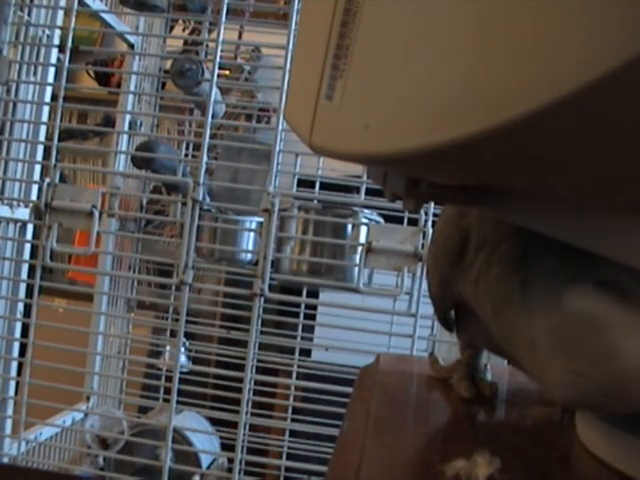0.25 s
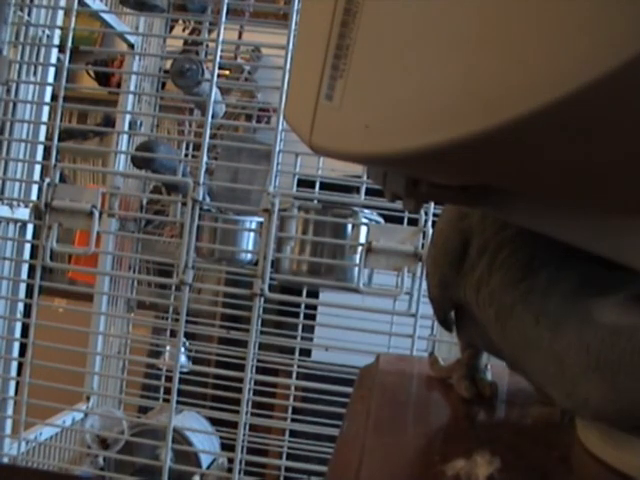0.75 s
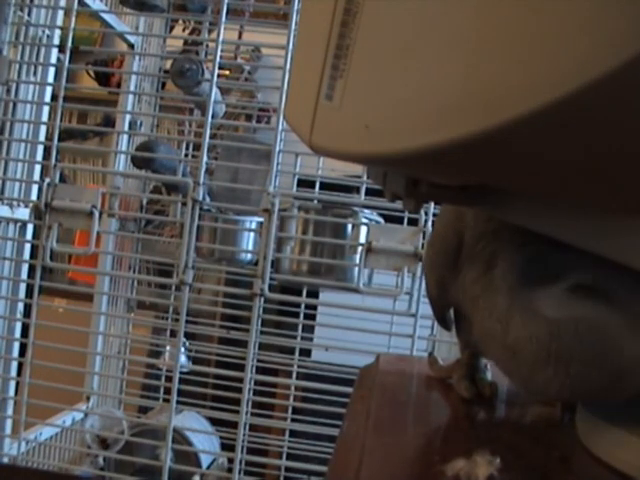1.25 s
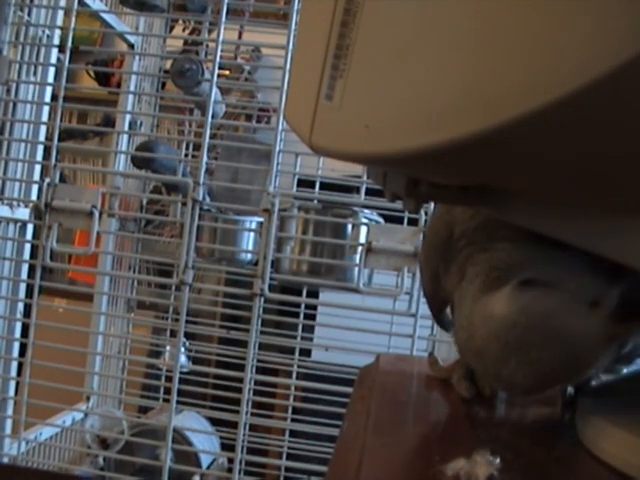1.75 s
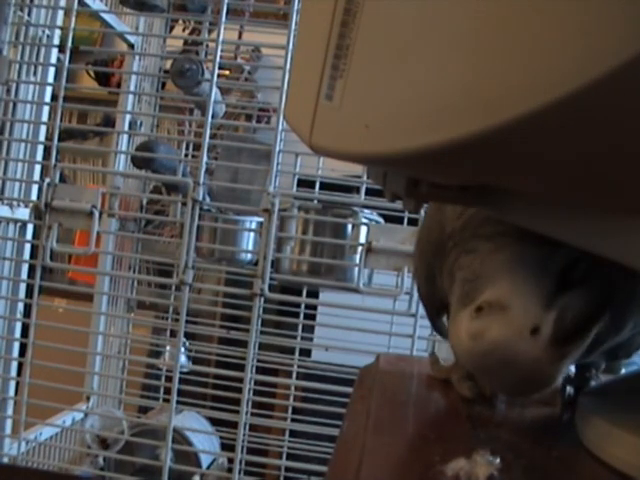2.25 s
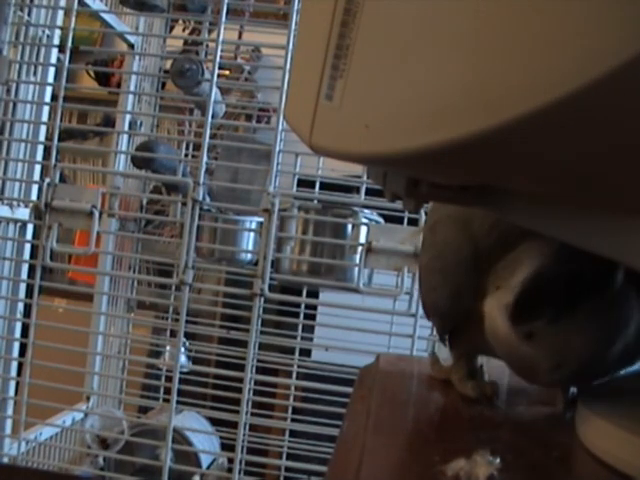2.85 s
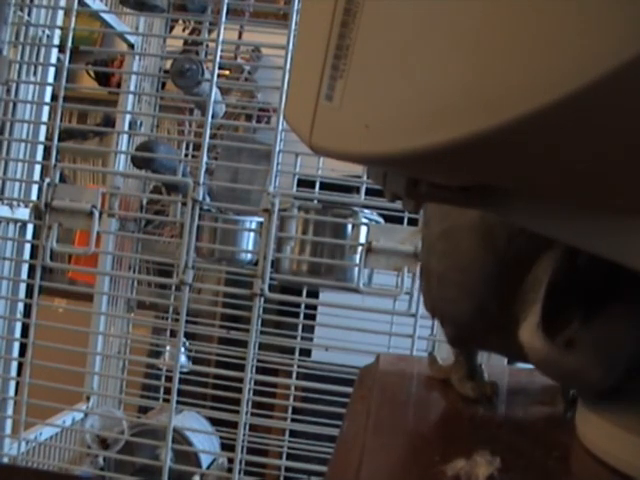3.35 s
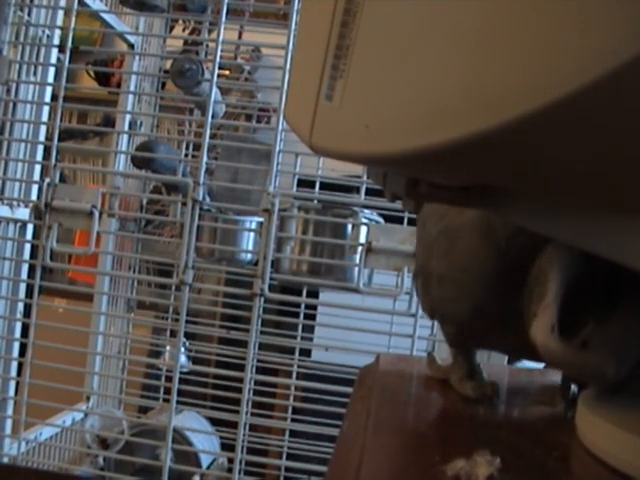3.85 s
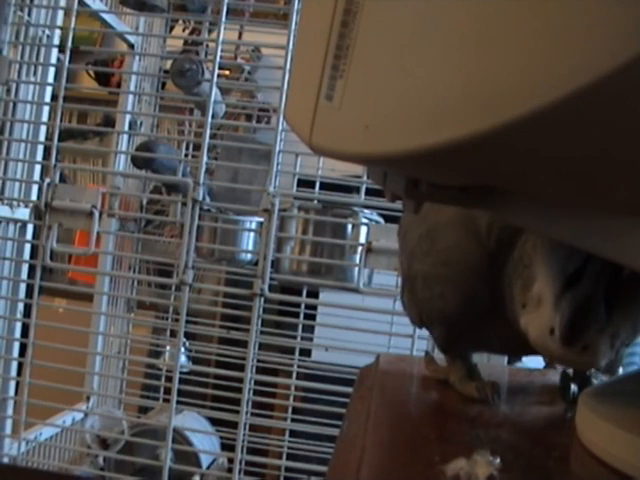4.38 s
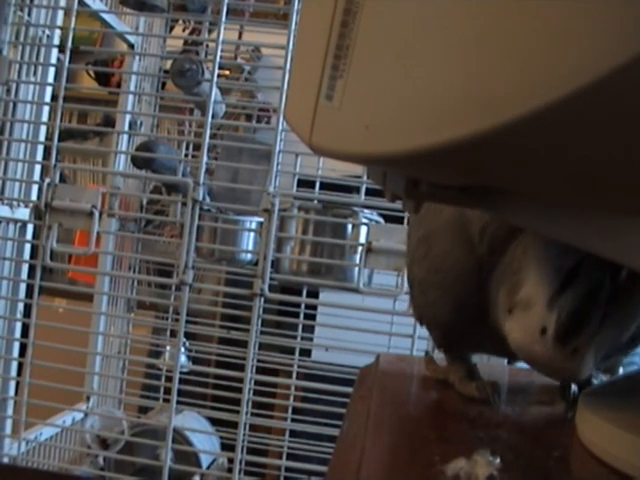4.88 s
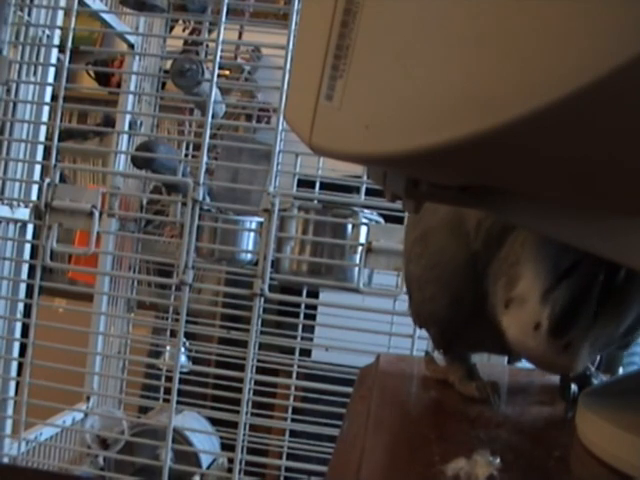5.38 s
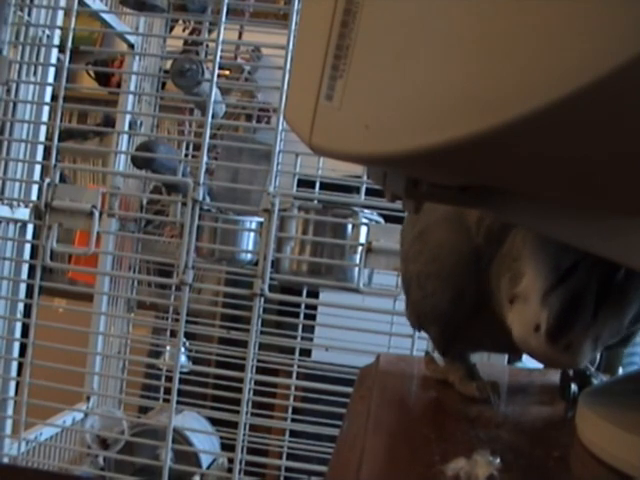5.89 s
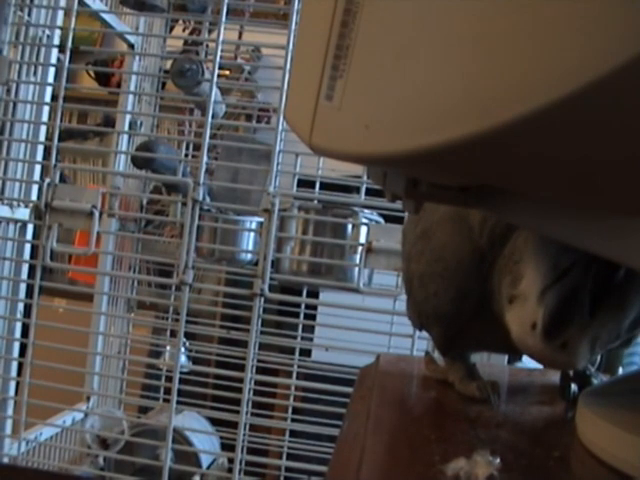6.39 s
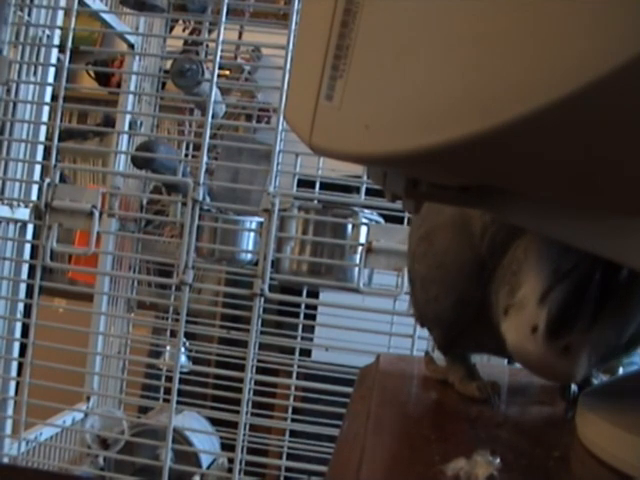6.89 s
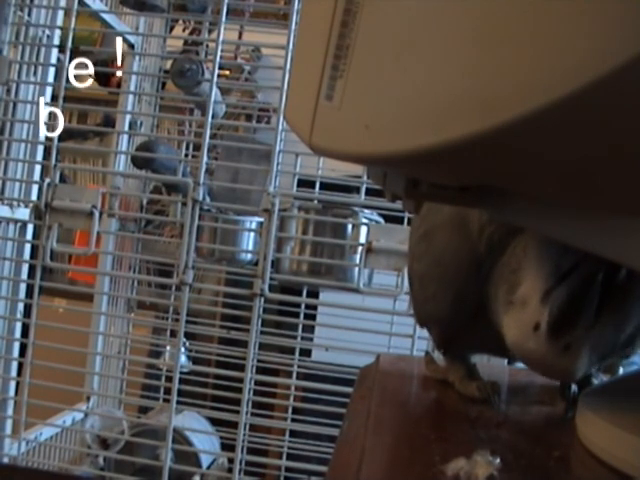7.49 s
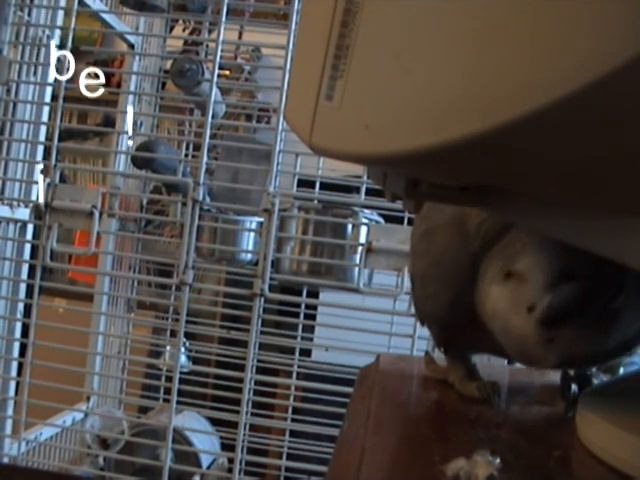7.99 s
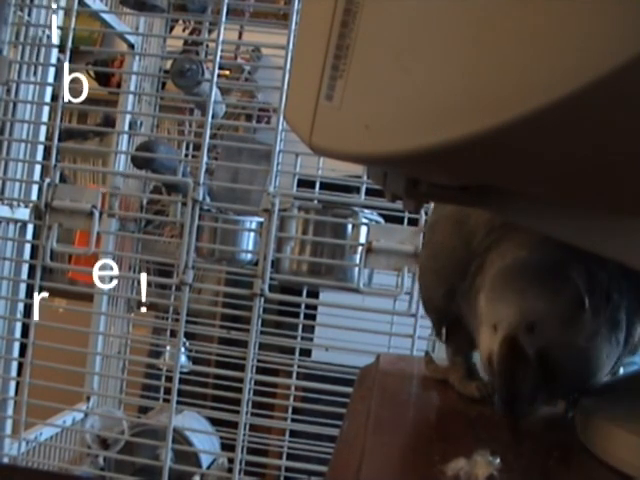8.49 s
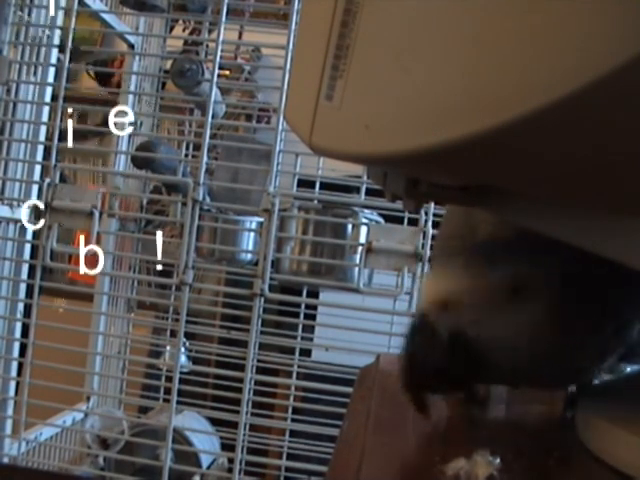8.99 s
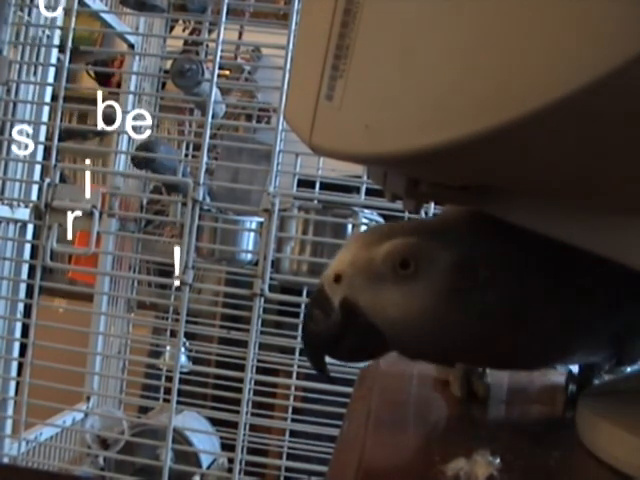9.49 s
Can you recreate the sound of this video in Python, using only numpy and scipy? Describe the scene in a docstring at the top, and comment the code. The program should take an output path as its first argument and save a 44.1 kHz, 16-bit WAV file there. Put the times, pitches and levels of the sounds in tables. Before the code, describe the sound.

Light tapping on wood grows into loud, uneven beak blows with clatter, thuds and short scrapes, while a small motor whirrs early over a far-off fan.

```python
"""At first a small motor by the microphone whirrs over a far-off fan, while a parrot on a wooden table taps
with beak and claws: decaying bands of noise. From 3.3 s to 7.9 s it bangs a block with its beak seven times,
with lighter taps, thuds and scrapes in between; table-top modes and the wires of its cage ring on.
The motor drops back after 4.2 s; a few last taps follow the blows. The hardest blows drive the limiter."""
import sys
import numpy as np
from scipy import signal
from scipy.io import wavfile

SR = 44100
rng = np.random.default_rng(int(sys.argv[2]) if len(sys.argv) > 2 else 0)


def int16_out(signal):
    """Quantize to a 16-bit WAV file."""
    q = np.round(np.clip(np.atleast_2d(signal).T, -1, 1) * 32767)
    wavfile.write(sys.argv[1], SR, q.astype(np.int16))


N = 429534


def amp(db):
    """Level law: decibels to amplitude ratio."""
    return 10 ** (np.asarray(db) / 20)


def rms_one(x):
    """Normalization to unit root-mean-square."""
    return x / np.sqrt(np.mean(x ** 2) + 1e-20)


def at_hz(points, hz):
    """Spectral interpolation: second column read at hz, linear in log frequency."""
    points = np.array(points)
    return np.interp(np.log(hz), np.log(points[:, 0]), points[:, 1])


def ring(clicks, hz, t60):
    """Impulse response of a damped oscillator: a unit click starts a decaying sine of height 1."""
    radius, w = amp(-60 / (t60 * SR)), 2 * np.pi * hz / SR
    feedback = [1, -2 * radius * np.cos(w), radius * radius]
    return signal.lfilter([0, np.sin(w)], feedback, clicks + 1e-18)


def resonate(x, modes):
    """Modal superposition: parallel resonances of (f/Hz, width/Hz, level/dB), signs alternating."""
    out = 0
    for k, (hz, width, db) in enumerate(modes):
        radius = np.exp(-np.pi * width / SR)
        feedforward = [1 - radius ** 2, 0, radius ** 2 - 1]
        feedback = [2, -4 * radius * np.cos(2 * np.pi * hz / SR), 2 * radius ** 2]
        out = out + (-1) ** k * amp(db) * signal.lfilter(feedforward, feedback, x)
    return out


# balance of the microphone pair: f/Hz, left minus right level/dB
PAIR_BALANCE = [(60, -0.5), (180, -0.5), (550, -0.5), (1650, -1.5), (4970, -0.5), (15000, 3.5)]
BAND_EDGES_HZ = 22 * 2 ** np.arange(0, 9.9, .4)


def bands(level, likeness, top_hz):
    """Interchannel coherence: band-passed noise shaped by level(hz), mixed from middle and side parts."""
    out = 0
    white = rng.standard_normal((2, 2, N))   # neighbouring bands use different noise
    edges = BAND_EDGES_HZ[BAND_EDGES_HZ < top_hz]
    for k, (low, high) in enumerate(zip(edges, edges[1:])):
        hz = np.sqrt(low * high)
        band_pass = signal.butter(2, [low, high], "band", fs=SR, output="sos")
        mid, side = signal.sosfilt(band_pass, level(hz) * white[k % 2])
        alike = np.clip(at_hz(likeness, hz), 0, 1)
        lean = at_hz(PAIR_BALANCE, hz) / 2
        pair = np.sqrt(1 + alike) * mid + np.sqrt(1 - alike) * side * [[1], [-1]]
        out = out + amp([[lean], [-lean]]) * pair
    return out


# hiss spectrum, relative: f/Hz, level/dB per Hz
HISS_SPECTRUM = [(880, -29), (1500, 0), (4830, -7), (5330, -14), (6830, -7), (11100, -11.5), (13500, 3),
                 (14600, -9), (16000, -36)]
# stereo width of hiss and fan: f/Hz, left-right likeness (1 = identical)
FLOOR_LIKENESS = [(60, 0.33), (180, 0.85), (550, 0.9), (1650, 0.086), (4970, 0.46), (15000, 0.4)]


def hiss():
    """Stationary random noise: microphone hiss with a fixed spectrum and unit rms."""
    return rms_one(bands(lambda hz: amp(at_hz(HISS_SPECTRUM, hz)), FLOOR_LIKENESS, SR / 2))


# fan spectrum, relative: f/Hz, level/dB per Hz
FAN_SPECTRUM = [(25, -16), (69, -8.5), (134, -11), (200, -6), (294, -13), (447, -15), (600, -15.5),
                (1060, -23), (3000, -36), (3900, -52)]
# fan duct resonances: f/Hz, width/Hz, level/dB
FAN_DUCT = [(296, 22, 13), (455, 36, 19), (1070, 70, 9)]


def fan():
    """Duct resonance: broadband air noise strengthened at the duct's modes, unit rms."""
    air = bands(lambda hz: amp(at_hz(FAN_SPECTRUM, hz)), FLOOR_LIKENESS, 5000)
    return rms_one(air + resonate(air, FAN_DUCT))


# motor housing resonances: f/Hz, width/Hz, level/dB
MOTOR_HOUSING = [(4210, 750, -0.5), (6850, 250, 0.5), (7980, 433, 2), (9960, 120, 3.5), (10700, 410, 2.5),
                 (12850, 1100, -8.5)]
TURNS_PER_S, FIRST_SWELL_S = 26.0, .004
SWELL_DB, SWELL_SHARPNESS = 8, 6   # peak rise; a larger sharpness makes a shorter swell


def motor():
    """Amplitude modulation: gear noise swells once a turn, filtered by the housing; unit rms."""
    half_turns = np.pi * TURNS_PER_S * (np.arange(N) / SR - FIRST_SWELL_S)
    throb = amp(SWELL_DB * np.cos(half_turns) ** (2 * SWELL_SHARPNESS))
    gears = rng.standard_normal(N) + 0.87 * rng.standard_normal((2, N))   # shared and per-channel parts
    return rms_one(resonate(throb * gears, MOTOR_HOUSING))


# background course: t/s, fan level/dB, motor level/dB
BACKGROUND = [(0, -47, -56.5), (3, -44, -56), (4.2, -40, -56), (4.4, -42.5, -69.5), (8.398, -43.5, -63.5),
              (9.74, -50.5, -92)]
HISS_DB, FLOOR_TOP_HZ = -59, 14200


def background():
    """Linear superposition: fan, hiss and motor add up, then pass one steep low-pass."""
    s, fan_db, motor_db = np.transpose(BACKGROUND)
    t = np.arange(N) / SR
    floor = amp(np.interp(t, s, fan_db)) * fan() + amp(HISS_DB) * hiss()
    floor = floor + amp(np.interp(t, s, motor_db)) * motor()
    return signal.sosfilt(signal.cheby2(10, 50, FLOOR_TOP_HZ, fs=SR, output="sos"), floor)


# claws and beak dragged over the wood: middle t/s, length/s, level/dB, f/Hz
SCRAPES = [(0.72, 0.087, -50, 4800), (1.777, 0.11, -44.5, 1660), (1.94, 0.068, -50.5, 3940),
           (2.949, 0.053, -39.5, 630), (3.669, 0.036, -29.5, 1150), (4.072, 0.14, -51, 1490),
           (4.926, 0.039, -31.5, 1820), (6.152, 0.058, -39.5, 1490), (6.964, 0.048, -48, 1460),
           (7.868, 0.011, -36, 2380), (8.276, 0.08, -42, 1520), (8.306, 0.066, -27, 860)]
GRIT_PER_S, RELATIVE_WIDTH = 4000, 0.7   # mean grain rate; resonance width re its frequency


def scrapes():
    """Friction as random impulses: uneven grit under a swelling stroke, twice through one broad resonance."""
    grit = (rng.random(N) < GRIT_PER_S / SR) * rng.laplace(0, 1, N)
    out = np.zeros(N)
    for s, length, db, hz in SCRAPES:
        size = int(length * SR)
        start = int(s * SR) - size // 2
        mode = [(hz, RELATIVE_WIDTH * hz, 0)]
        swell = np.hanning(size) * grit[start:start + size]
        stroke = np.r_[swell, np.zeros(size // 2)]   # room to ring out
        out[start:start + len(stroke)] += amp(db) * rms_one(resonate(resonate(stroke, mode), mode))
    return out


# cage wires, low to high: f/Hz, t60/s, level/dB
CAGE_WIRES = [(1077, 0.38, -50.5), (1380, 2.7, -46), (1650, 1.12, -44.5)]


def cage():
    """Free vibration after impact: each hard blow rings the wires, favouring the high or the low one."""
    blows, out = np.array(BLOWS), np.zeros(N)
    for side, (hz, t60, db) in zip((-1, 0, 1), CAGE_WIRES):
        clicks = np.zeros(N)
        clicks[(blows[:, 0] * SR).astype(int)] = amp(db + side * blows[:, -1])
        out += ring(clicks, hz, t60)
    return out


# Hit levels are relative to the wood spectrum; t60 is further scaled by frequency.
# dry claw ticks: t/s, middle level/dB, treble level/dB re middle
CLAWS = [(.423, -7.5, -3.5), (0.603, -15.5, -22.5), (0.654, -15, -8.5), (0.713, -34, 6), (.731, -18.5, -23),
         (0.798, -21.5, -40), (0.843, -51, 17.5), (.917, -12, -9), (.993, -30, -5.5), (1.028, -29.5, -21),
         (1.097, -31, -19), (1.139, -14.5, -10), (1.228, -17.5, -18), (1.348, -24.5, -9), (1.634, -20, -15),
         (1.798, -17.5, -23), (1.837, -22, -15.5), (6.728, -36, -7), (8.214, -4.5, -16)]
CLAW_T60_S = 0.08
# lighter beak taps on the wood: t/s, middle level/dB, treble level/dB re middle, t60/s
TAPS = [(.03, -18, -21, 0.32), (.093, -11.5, -22.5, 0.18), (.35, -17, -15.5, 0.18),
        (1.316, -21.5, -18, 0.041), (1.424, -17, -10.5, 0.13), (1.483, -22, -20, 0.2),
        (1.528, -33, -4, 0.058), (1.889, -17.5, -8, 0.49), (1.969, -23.5, -28, 0.98),
        (2.026, -12, -27, 0.2), (2.073, -14.5, -7.5, 0.12), (2.108, -20, -13, 0.27),
        (2.145, -23, -13, 0.094), (2.278, -29.5, -22, 1), (2.425, -11, -18, 0.12),
        (2.487, -25, -16.5, 0.39), (2.533, -23.5, -42, 0.47), (2.736, -30.5, -31, 0.97),
        (2.793, -34.5, -2, 0.32), (3.665, -4.5, -16, 0.14), (3.701, -8, -15.5, 0.22),
        (3.733, -4.5, -17, 0.18), (4.078, -12, -15.5, 0.19), (4.109, -12, -20, 0.21),
        (4.195, -8.5, -21.5, 0.19), (4.285, -13, -24.5, .18), (4.411, -17.5, -37, 0.16),
        (4.817, -6, -23.5, 0.14), (4.855, -7.5, -21.5, 0.24), (4.914, -8, -24, 0.27),
        (5.488, -21, -14.5, .34), (5.565, -6.5, -24, 0.23), (5.8, -33.5, -10, 0.19),
        (6.272, -18.5, -29, 0.37), (6.607, -16.5, -11.5, 0.32), (6.86, -15.5, -22.5, 0.16),
        (6.965, -17.5, -21, 0.25), (7.004, -6.5, -22, 0.35), (7.499, -10.5, -21, 0.37),
        (7.673, -1.1, -13.5, .13), (8.297, -13.5, -24, 0.13), (8.435, -34, -33, .05), (8.79, -44, 2, 0.26)]
# heavy, low bumps of the block on the table: columns as for the taps
THUDS = [(2.943, -20.5, -21, 0.22), (3.069, -7.5, -24.5, 0.17), (3.134, -2.5, -21, 0.18),
         (3.261, -33, -12, 0.63), (3.569, -32.5, -16, 0.53), (5.451, -17.5, -20, 0.08),
         (5.628, -30.5, -13, 0.74), (6.175, -10.5, -17, 0.2), (6.343, -28.5, -17, 0.34),
         (6.639, -14.5, -17, 0.29), (6.919, -23.5, -16.5, 0.24), (7.811, -33, -38, 0.86)]
# shared by one kind of hit: bass level/dB re middle, middle f/Hz, crack level/dB re middle,
# lowest-band level/dB re bass, top-octave level/dB re treble
CLAW_KIND = (-11.5, 1644, 7, -0.5, -9.5)
TAP_KIND = (-9.5, 903, 6.5, -7, -4.5)
THUD_KIND = (0.3, 755, 3.5, -1.5, 1.5)
# hard blows: t/s, middle level/dB, treble level/dB re middle, t60/s, middle f/Hz,
# level/dB added to the high cage wire and taken from the low one
BLOWS = [(3.299, 1, -9.5, 0.33, 1710, -3.5), (4.632, 4, -13, 0.37, 1200, 7),
         (5.254, 1.5, -13, 0.41, 700, 4), (5.921, 4.5, -17.5, 0.35, 700, -3),
         (6.514, 3.5, -16.5, .31, 830, 13), (7.35, 6, -20, 0.23, 1280, 0), (7.871, 1, -18.5, .17, 1090, -6)]
BLOW_BASS_DB, BLOW_CRACK_DB = -10.5, 4.5   # re middle


def all_hits():
    """Common impact model: rows of (t/s, middle, bass, treble/dB, t60/s, f/Hz, crack, lowest, top/dB)."""
    hits = [(s, db, BLOW_BASS_DB, treble, t60, hz, BLOW_CRACK_DB, 0, 0)
            for s, db, treble, t60, hz, _ in BLOWS]
    claws = [(*row, CLAW_T60_S) for row in CLAWS]
    for rows, kind in ((TAPS, TAP_KIND), (THUDS, THUD_KIND), (claws, CLAW_KIND)):
        bass, hz, crack, lowest, top = kind
        hits += [(s, db, bass, treble, t60, hz, crack, lowest, top) for s, db, treble, t60 in rows]
    return np.array(hits)


# wood spectrum of a blow, relative: f/Hz, level/dB per Hz
WOOD_SPECTRUM = [(15, -51), (25, -18.5), (103, -39.5), (167, -9), (482, -4.5), (615, -11), (852, -15.5),
                 (976, -9.5), (2140, -15), (6020, -36), (7890, -35), (14000, -52), (16400, -72)]


def strength_db(hits, hz):
    """Excitation spectrum: each hit bends the colour of the wood by its own levels from bass to treble."""
    usual = np.interp(np.log(hz), np.log([350, 1500, 6000]), [-11, 0, -16])
    own = []
    for _, _, bass, treble, _, middle_hz, _, lowest, top in hits:
        places = np.log([70, 350, np.clip(middle_hz, 500, 4000), 6000, 12000])
        own.append(np.interp(np.log(hz), places, [bass + lowest, bass, 0, treble, treble + top]))
    return hits[:, 1] + np.array(own) - usual + at_hz(WOOD_SPECTRUM, hz)


# damping of the wood: f/Hz, factor on a hit's t60
FADE = [(100, 0.99), (300, 1.435), (700, 0.95), (1800, 0.99), (5000, 0.85), (12000, 0.81)]
# stereo width of the hits: f/Hz, left-right likeness (1 = identical)
HIT_LIKENESS = [(60, 0.4), (180, 1), (550, 0.97), (1650, 0.94), (4970, 0.87), (15000, 0.75)]
# table-top modes: f/Hz, level/dB, t60/s
TABLE_TOP = [(179.6, -13, 0.67), (264.4, 6.5, 0.71), (304.2, 4, 0.44), (337.1, 2, 0.39), (431.7, -1, 0.174),
             (477, 8, 0.21), (513, 0.5, 0.38), (688.4, 10, 0.27), (834, 4, 0.27), (914, -0.5, 0.37),
             (1068, -3, 0.32), (1352, 8, 0.18), (1694, 1.5, 0.028), (2022, 8, 0.054)]
PULSE_HZ, PULSE_DB, PULSE_T60_S = 46, -20.5, .07   # low pulse at each hit; level on top of the hit's own
ROOM_DB, ROOM_T60_S = -18, 0.51   # re the body; t60 before FADE
RISE_CYCLES = 0.69
# crack t60 at 1500 Hz, exponent by which it shortens upwards, and level slope
CRACK_T60_S, CRACK_SHORTER, CRACK_DB_PER_OCTAVE = 0.047, 0.23, 3
FLUTTER_DB, FLUTTER_HZ, SPREAD_DB = 1.5, 50, 1.2   # rms flutter, its bandwidth; spread per hit and band


def knocks():
    """Impact and modal decay: a crack, dense wood ringing that dies band by band, room and table modes."""
    hits = all_hits()
    step = 12   # samples per envelope point
    age = np.arange(SR // step) * step / SR
    radius = np.exp(-2 * np.pi * FLUTTER_HZ * step / SR)

    def level(hz):
        """Energy summation: the powers of all hits add in one band."""
        power = np.full(N // step + len(age) + 1, 1e-20)
        fade, pitch = at_hz(FADE, hz), hz / 1500
        rise = (1 - np.exp(-age / (RISE_CYCLES / hz))) ** 2   # lows build up slowly
        crack_decay = amp(-120 * age / CRACK_T60_S * pitch ** CRACK_SHORTER)   # 120: power, not amplitude
        crack = pitch ** (CRACK_DB_PER_OCTAVE / 3) * crack_decay
        room = amp(2 * (ROOM_DB - 60 * age / ROOM_T60_S / fade))
        spread = rng.normal(0, SPREAD_DB, len(hits))   # random level spread per hit and band
        for (s, t60, crack_db), db in zip(hits[:, [0, 4, 6]], strength_db(hits, hz) + spread):
            start = int(s * SR / step)
            body = amp(-120 * age / (max(t60, .02) * fade))
            power[start:start + len(age)] += amp(2 * db) * rise * (body + room + amp(2 * crack_db) * crack)
        noise = rng.standard_normal(len(power))
        # random level flutter of each noise band
        flutter = rms_one(signal.lfilter([1], [1, -2 * radius, radius ** 2], noise))
        return np.repeat(np.sqrt(power) * amp(FLUTTER_DB * flutter), step)[:N]

    wood = amp(7.5) * bands(level, HIT_LIKENESS, SR / 2)
    modes = [(hz, np.log(1000) / np.pi / t60, db) for hz, db, t60 in TABLE_TOP]   # t60 to width
    table = resonate(wood.mean(axis=0), modes)
    clicks = np.zeros(N)   # start a low pulse at each hit
    clicks[(hits[:, 0] * SR).astype(int)] = amp(hits[:, 1] + hits[:, 2] + hits[:, 7] + PULSE_DB)
    return wood + table + ring(clicks, PULSE_HZ, PULSE_T60_S)


def scene():
    """Linear superposition: background, scrapes, cage wires and knocks."""
    return background() + scrapes() + cage() + knocks()


LIMIT_DB, RELEASE_DB_PER_S, ATTACK_S = -3.5, 340, 0.0012
CUTOFF_HZ = 16900


def record(dry):
    """Peak limiting: gain ducks fast and recovers at a steady rate; the rest is clipped and low-passed."""
    level_db = 20 * np.log10(np.abs(dry).max(axis=0) + 1e-9)
    over = np.maximum(level_db - LIMIT_DB, 0)
    slope = RELEASE_DB_PER_S * np.arange(N) / SR
    held = np.maximum.accumulate(over + slope) - slope   # peak hold with linear release
    r = np.exp(-1 / (ATTACK_S * SR))
    ducked = dry * amp(-signal.lfilter([1 - r], [1, -r], held))
    clipped = np.clip(ducked, -.93, .93)
    return signal.sosfilt(signal.cheby2(16, 90, CUTOFF_HZ, fs=SR, output="sos"), clipped)


dry = scene()
out = record(dry)
int16_out(out)
```